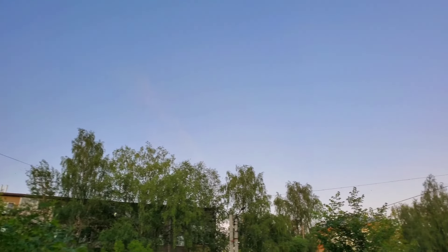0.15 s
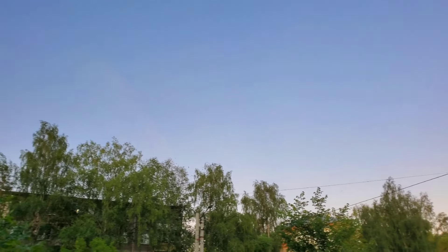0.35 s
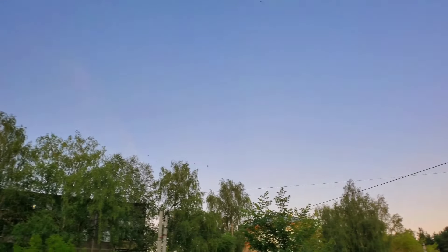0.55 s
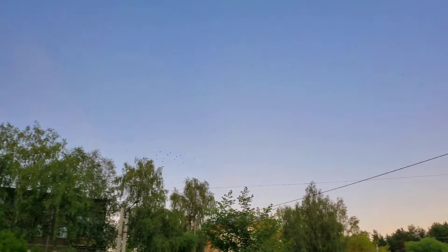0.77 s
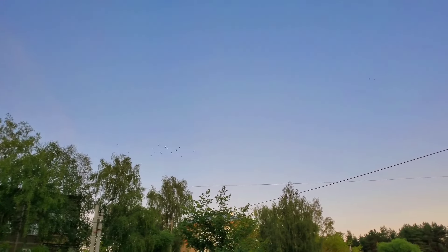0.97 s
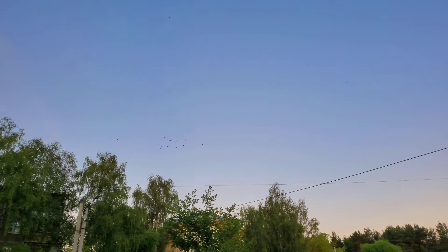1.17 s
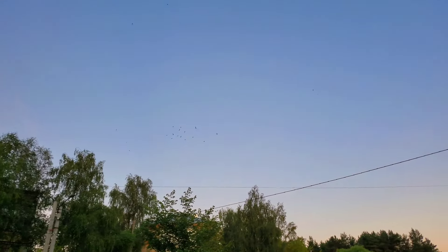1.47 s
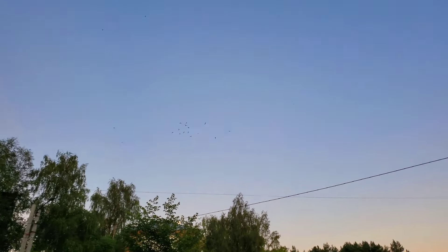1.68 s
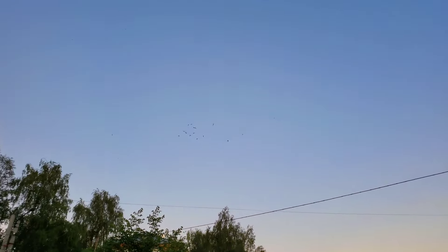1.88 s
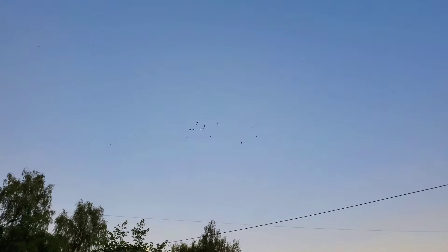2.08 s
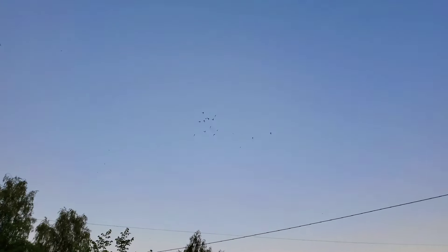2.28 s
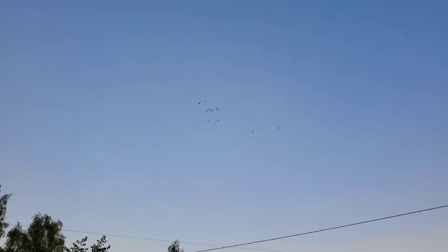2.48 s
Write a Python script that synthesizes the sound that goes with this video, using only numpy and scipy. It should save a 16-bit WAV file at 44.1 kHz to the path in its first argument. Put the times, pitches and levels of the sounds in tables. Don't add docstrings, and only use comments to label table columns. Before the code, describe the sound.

Shrill swift screams overlap and swell as the flock passes overhead, with tiny chips between them and a light echo off trees and houses; distant engines and tyres murmur below, heard on a small open-air stereo microphone.

```python
import sys
import numpy as np
from scipy import signal
from scipy.fft import rfft, irfft, next_fast_len
from scipy.io import wavfile
from scipy.ndimage import uniform_filter1d, map_coordinates

SR = 44100
rng = np.random.default_rng(int(sys.argv[2]) if len(sys.argv) > 2 else 0)


def file_out(sig):
    cols = np.atleast_2d(sig).T
    lim = np.clip(cols, -1, 1)
    pcm = np.round(lim * 32767).astype(np.int16)
    wavfile.write(sys.argv[1], SR, pcm)


def gain_from_db(level_db):
    decades = np.asarray(level_db, float) / 20
    return 10 ** decades


N = 116424

# start_s, level_db
ENGINE_LEVEL = [
    (0.0, -32),
    (0.14, -36),
    (0.9, -35.5),
    (1.02, -42),
    (1.1, -31.5),
    (1.23, -41),
    (1.26, -34.5),
    (2.51, -35),
    (2.64, -39.5),
]
# start_s, level_db
TYRE_LEVEL = [
    (0.0, -47.5),
    (0.41, -50),
    (0.53, -46),
    (0.88, -50),
    (1.27, -50),
    (1.68, -45),
    (2.21, -50.5),
    (2.38, -46.5),
    (2.42, -49),
    (2.64, -49),
]
# freq_hz, density_db_per_hz
RUMBLE_SPECTRUM = [(12, -72), (20, -17), (36, -9), (86, 4), (140, -9), (184, -15.5), (240, -13.5),
                   (330, -30.5), (450, -55)]
TOWN_SPECTRUM = [(150, -36), (260, -10), (370, -3.5), (430, -11), (650, -8), (1010, -17.5), (1500, -15),
                 (2560, -26), (4200, -39.5), (5500, -48)]
TYRE_SPECTRUM = [(300, -5), (700, -3), (1500, 2), (2500, -5.5), (4200, -15.5), (6000, -32)]
AIR_SPECTRUM = [(3000, -47), (4300, -16), (5800, 11), (6400, 1), (6900, -24), (8500, -6.5), (11500, -8),
                (13000, -30), (15400, -45)]
# freq_hz, correlation
LIKENESS = [(60, .96), (200, .95), (400, .76), (800, .66), (1500, .27), (3000, .3), (8000, .1)]
TOWN_DB, TYRE_DB, AIR_DB = -46, 3, -45.5

# pitch_hz, wander_hz, start_s, end_s
MOTORS = [
    (653, 3, -1, 4),
    (367, 10, .45, 1.3),
    (238, 10, 1.28, 1.9),
    (181, 14, -1, 4),
    (1480, 30, 2.2, 2.5),
    (92, 12, 1.15, 4),
    (126, 10, -1, 4),
    (48, 8, .3, 2.1),
]
MOTOR_LEVELS_DB = [-56, -51, -46.5, -50, -53.5, -37, -47.5, -45]

# start_s, length_s, top_pitch_hz, top_at_share_of_length, swoop_share_of_pitch
SCREAMS = [(-.3, .47, 6150, .45, .1), (-.1, .3, 4700, .8, .1), (.2, .43, 6200, .62, 0),
           (.213, .3, 5220, .95, .04), (.45, .12, 5400, .35, .02), (.59, .2, 5920, .55, .02),
           (.69, .245, 5090, .7, 0), (.6, .3, 5700, .5, 0), (.932, .333, 6150, .52, .12),
           (.94, .3, 5880, .55, .13), (1.07, .121, 6950, .5, .05), (1.29, .296, 5900, .45, .09),
           (1.362, .476, 7000, .48, .13), (1.612, .33, 6120, .48, .14), (1.918, .278, 6090, .42, .06),
           (2.216, .26, 6060, .37, .2), (2.246, .315, 6020, .4, .08), (2.546, .3, 5950, .3, .1),
           (.19, .14, 5520, .7, .01), (-.15, .3, 5650, .5, 0), (2.0, .2, 5860, .4, 0)]
SCREAM_LEVELS_DB = [-48, -54, -46.5, -42, -42, -46.5, -47.5, -47.5, -35.5, -40, -44, -39, -36, -37, -32,
                    -35.5, -32, -29.5, -46, -51, -38]
TRILL_RATES_HZ = [60, 50, 55, 4, 60, 60, 4, 4, 55, 62, 45, 31, 40, 70, 31, 4, 62, 60, 4, 45, 31]
SAGS = [.07, .05, .06, .05, .05, .04, .015, .015, .07, .05, .03, .045, .09, .075, .055, .08, .075, .07, .02,
        .03, .03]
TURNS_DB = [0, -4, 0, 0, 0, 6, 12, 8, 7, -4, 6, 0, -9, 0, -1, 3, 4, 6, 0, 0, 6]
BEAKS_DB = [-3, -3, -3, 0, 0, -3, -3, -3, -3, -6, -5, -10, -1, 2, -4, -7, -1, -5, -3, -3, -3]
ODD_AT = [.5, .5, .5, .5, .5, .5, .5, .5, .3, .3, .5, .5, .1, .35, .45, .4, .33, .3, .5, .5, .5]
# start_s, pitch_hz, level_db, half_length_s, fall_share_of_pitch_per_s
CHIPS = [
    (1.251, 4800, -45, .003, 20),
    (1.572, 4400, -56, .004, 20),
    (1.893, 4950, -47, .003, 15),
    (1.905, 4100, -53, .003, 12),
    (2.181, 4340, -46.5, .007, 1),
    (2.576, 4500, -46, .0015, 40),
]
# multiple_of_main_line, level_db
PARTIALS = [(.5, -40), (1, 0), (1.5, -22), (2, -12), (2.5, -26)]

ATTACK_S, RELEASE_S, FADE_DB = .013, .015, 2.5
SWOOP_S, ARCH_SHARE = .015, .09
WAVER_SHARE, FLUTTER_DB, RASP = .0075, 1.2, .33
BUZZ_HZ, BUZZ_DEPTH, BUZZ_SCATTER = 275, .3, .16
BUZZ_SWING = .38
TRILL_SHARE, TRILL_MIN_S, TRILL_DEPTH, TRILL_SHARP, TRILL_DB = .36, .09, .86, 2, 2.5
ODD_DB, ODD_SPAN, ODD_DIP_DB = 4, .16, 10
NEAR_DB, AIR_LOSS = -37, .51
ECHO_DB, ECHO_T60_S, FAR_WET = -8, .4, .2
DRIFT_HZ, OVERHEAD_LAG_S = 1.5, .00004
TOWN_LAG_S = .00028

# freq_hz, left_over_right_db
PORT_DIFFERENCE = [(60, -1.5), (600, -4.5), (1500, -2), (6500, -2), (8500, 18), (12000, 7), (15000, 25)]
# freq_hz, gain_db
MIC_RESPONSE = [(6300, 1.5), (6900, 1.5), (7300, -2.5), (7700, 6), (8200, -4), (12300, -3.5), (13300, -10),
                (15400, 1.5)]
TOP_HZ = 15400


def unit(x):
    return x / np.sqrt(np.mean(x ** 2) + 1e-20)


def along(points, hz):
    f, v = np.transpose(points)
    return np.interp(np.log(hz + 1), np.log(f + 1), v)


def curve(rows):
    return np.interp(np.arange(N) / SR, *np.transpose(rows))


def wobble(rate_hz, size=N):
    knots = rng.standard_normal(int(N * 400 / SR))
    return map_coordinates(knots, [np.arange(size) * rate_hz / SR + 2])


def filtered(x, response):
    m = next_fast_len(N + SR // 2)
    return irfft(rfft(x, m) * response(np.fft.rfftfreq(m, 1 / SR)), m)[..., :N]


def late(x, lag_s):
    sides = np.array([[.5], [-.5]])
    return filtered(x, lambda hz: np.exp(-2j * np.pi * hz * sides * lag_s))


def rush(spectrum, patchy_db):
    z = signal.stft(rng.standard_normal((2, N)), nperseg=512)[2]
    patches = uniform_filter1d(rng.standard_normal(z.shape[1:]), 6, 0)
    patches = uniform_filter1d(patches, 14, 1)
    pair = signal.istft(z * gain_from_db(patchy_db * unit(patches)), nperseg=512)[1][:, :N]
    points = [(4.6, -120)] + list(spectrum) + [(22000, -120)]

    def response(hz):
        angle = np.arccos(np.clip(along(LIKENESS, hz), -1, 1)) / 2
        return gain_from_db(along(points, hz)) * [np.cos(angle), np.sin(angle)]

    mid, side = filtered(pair, response)
    return unit(np.array([mid + side, mid - side]))


def traffic():
    engines = gain_from_db(curve(ENGINE_LEVEL) + wobble(9)) * rush(RUMBLE_SPECTRUM, patchy_db=.5)
    swell_db = curve(TYRE_LEVEL)
    peak_db = swell_db.max()
    tyre_db = TYRE_DB + peak_db + 2.92 * (swell_db - peak_db)
    tyres = gain_from_db(tyre_db) * rush(TYRE_SPECTRUM, patchy_db=2.5)
    town = gain_from_db(TOWN_DB) * rush(TOWN_SPECTRUM, patchy_db=.07)
    air = gain_from_db(AIR_DB) * rush(AIR_SPECTRUM, patchy_db=4.0)
    return engines + tyres + town + air


def motors():
    t = np.arange(N) / SR
    total = np.zeros(N)
    for (hz, wander_hz, start_s, end_s), db in zip(MOTORS, MOTOR_LEVELS_DB):
        level = gain_from_db(db + 1.1 * wobble(7.84))
        fade = np.clip(np.minimum(t - start_s, end_s - t) / .2, 0, 1)
        phase = 2 * np.pi * np.cumsum(hz + wander_hz * wobble(14) / 2) / SR
        total += level * fade * np.sqrt(2) * np.sin(phase)
    return total


def whistle(hz, gain, db, beak_db=0, odd_db=0):
    phase = 2 * np.pi * np.cumsum(hz, axis=-1) / SR
    n = phase.shape[-1]
    overtone_db = beak_db + AIR_LOSS * min(db - NEAR_DB, 0)
    total = 0
    for k, part_db in PARTIALS:
        odd = k % 1
        level_db = part_db + overtone_db * (k > 1) + (odd > 0) * (odd_db + ODD_DB * wobble(17.0, n) / 2)
        rasp = 1 + RASP * (k + 3 * odd) * wobble(380, n)
        total = total + gain_from_db(level_db) * rasp * np.sin(k * phase)
    return gain_from_db(db) * gain * total


def scream(length_s, top_hz, top_at, swoop, sag, db, turn_db, beak_db, odd_at, trill_hz):
    n = int(length_s * SR)
    t = np.arange(n) / SR
    x = t / length_s
    rise = ARCH_SHARE * (1 - x / top_at) ** 2
    sink = sag * abs((x - top_at) / (1 - top_at)) ** 2.0
    below = swoop * np.exp(-t / SWOOP_S) + np.where(x < top_at, rise, sink)

    buzz_hz = BUZZ_HZ * (1 + BUZZ_SCATTER * wobble(117.6, n))
    buzz = 2 * np.pi * np.cumsum(buzz_hz) / SR
    waver = WAVER_SHARE * (wobble(34.44, n) + .5 * wobble(145.9, n))
    hz = top_hz * (1 - below + waver)
    hz = hz + DRIFT_HZ * np.outer([1, -1], wobble(8.2, n))
    hz = hz + BUZZ_SWING * buzz_hz * np.cos(buzz)

    trill_s = max(TRILL_SHARE * length_s, TRILL_MIN_S)
    broken = np.clip((t - length_s + trill_s) / .027, 0, 1)
    beat = 2 * np.pi * trill_hz * (length_s - t)
    pulse = ((1 - np.cos(beat)) / 2) ** TRILL_SHARP
    gate = 1 - TRILL_DEPTH * broken * (1 - pulse)
    odd_db = -ODD_DIP_DB * np.clip(((x - odd_at) / ODD_SPAN) ** 2 - broken, 0, 1 - broken / 2)

    ends = (1 - np.exp(-t / ATTACK_S)) * np.clip((length_s - t) / RELEASE_S, 0, 1)
    body = ends * gain_from_db(-FADE_DB * abs(x - top_at) * 2 + turn_db * (x - 1.0) + TRILL_DB * broken)
    port_flutter = np.array([wobble(32, n), wobble(29.0, n)])
    flutter = gain_from_db(FLUTTER_DB * (wobble(46.7, n) + .95 * port_flutter))
    gain = np.sqrt(2) * body * gate * (1 + BUZZ_DEPTH * np.sin(buzz)) * flutter
    return whistle(hz, gain, db, beak_db, odd_db)


def add_call(flock, call, start, echo_db):
    send = gain_from_db([0, echo_db])[:, None, None]
    flock[..., start:][..., :call.shape[-1]] += send * call


def add_screams(flock):
    rows = zip(SCREAMS, SAGS, SCREAM_LEVELS_DB, TURNS_DB, BEAKS_DB, ODD_AT, TRILL_RATES_HZ)
    for (start_s, *shape), sag, db, *manner in rows:
        call = scream(*shape, sag, db, *manner)
        add_call(flock, call, round((start_s + 1) * SR), ECHO_DB + FAR_WET * max(NEAR_DB - db, 0))


def add_chips(flock):
    t = np.arange(-800, 800) / SR
    for s, hz, db, half_s, fall in CHIPS:
        chip = whistle(hz * (1 - fall * t), np.exp(-(t / half_s) ** 2), db)
        add_call(flock, chip, round((s + 1) * SR) - 800, ECHO_DB)


def yard_echo(sent):
    t = np.arange(SR // 2) / SR
    tail = rng.standard_normal((2, len(t))) * gain_from_db(-60 * t / ECHO_T60_S) * (1 - np.exp(-t / .008))
    return signal.fftconvolve(sent, tail / np.linalg.norm(tail[0]), axes=1)[:, :sent.shape[1]]


def swifts():
    flock = np.zeros((2, 2, N + 2 * SR))  # direct/send, port, time; 1 s lead-in
    add_screams(flock)
    add_chips(flock)
    direct, sent = flock
    return (direct + yard_echo(sent))[:, SR:SR + N]


def scene():
    return late(traffic() + motors(), TOWN_LAG_S) + late(swifts(), OVERHEAD_LAG_S)


def roll_off(x):
    return signal.sosfilt(signal.butter(12, 15400, fs=SR, output="sos"), x)


def record(dry):
    sides = np.array([[.5], [-.5]])

    def ports(hz):
        return gain_from_db(sides * along(PORT_DIFFERENCE, hz) + along(MIC_RESPONSE, hz)) * (hz < TOP_HZ)

    return roll_off(filtered(dry, ports))


dry = scene()
out = record(dry)
file_out(out)
```